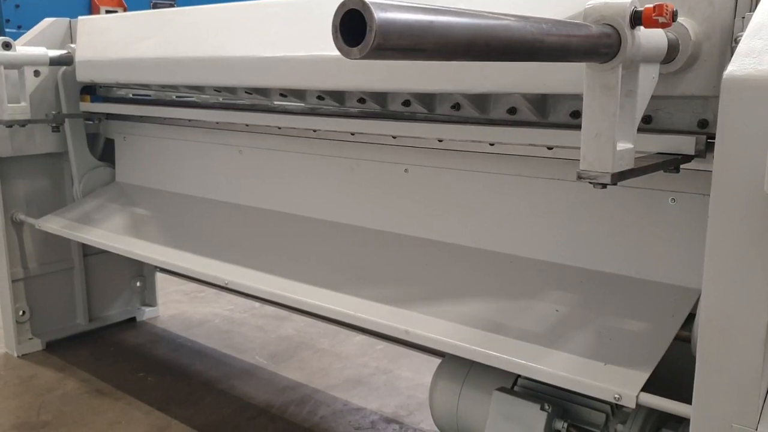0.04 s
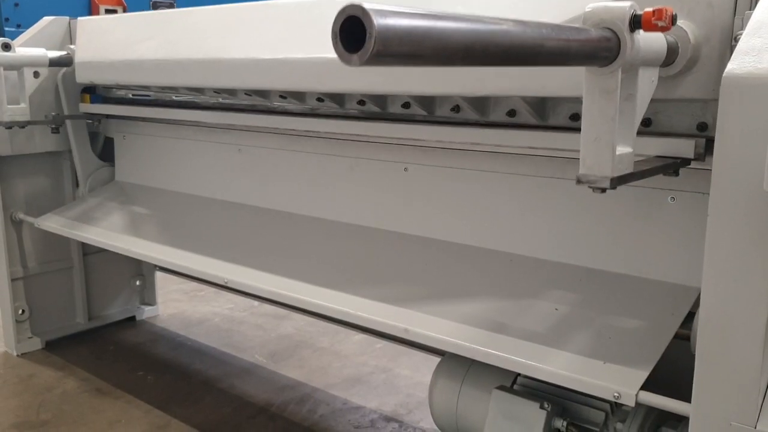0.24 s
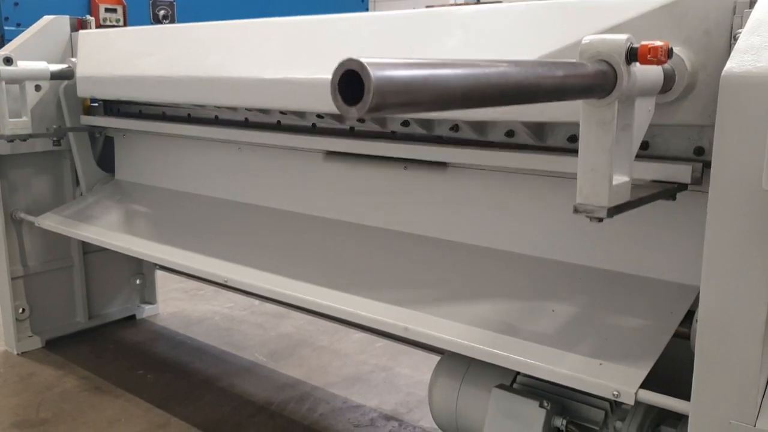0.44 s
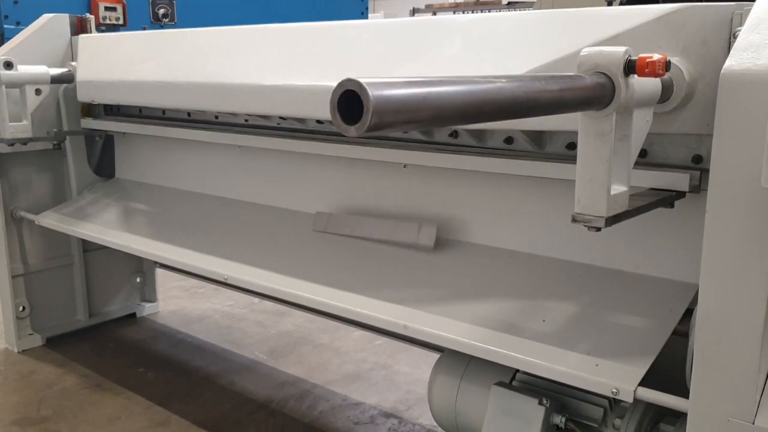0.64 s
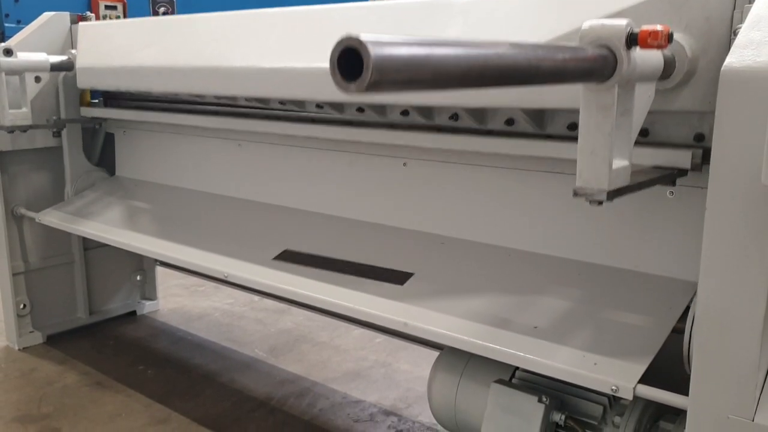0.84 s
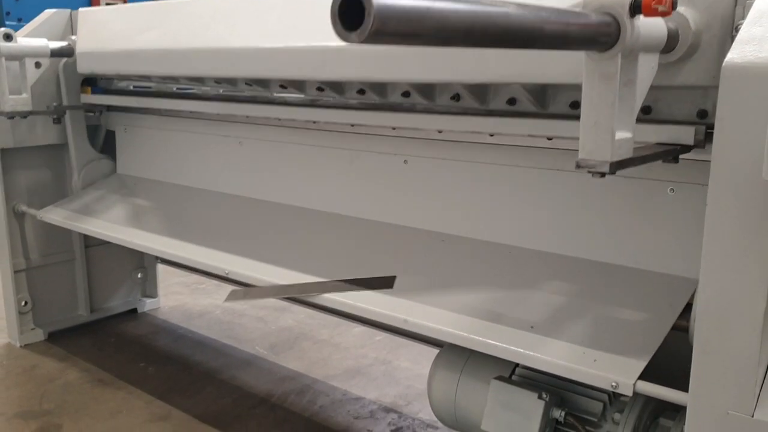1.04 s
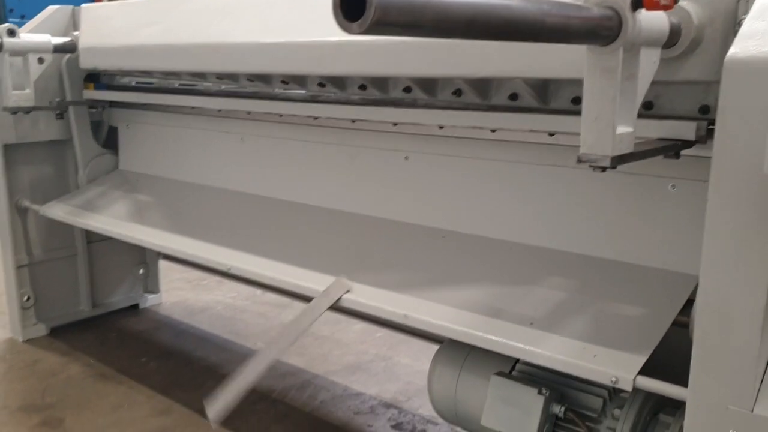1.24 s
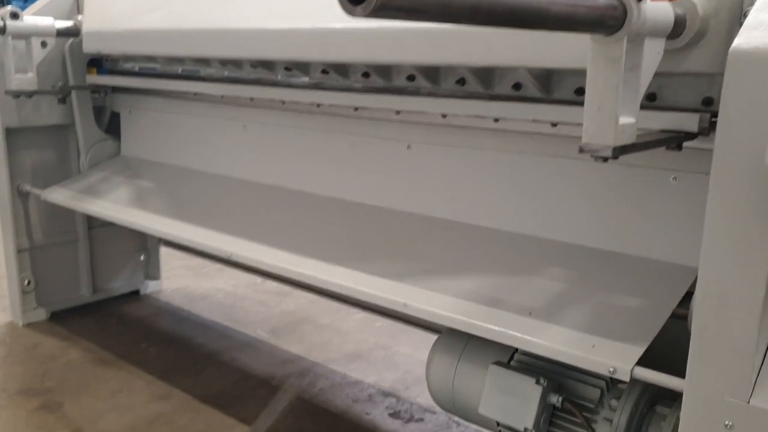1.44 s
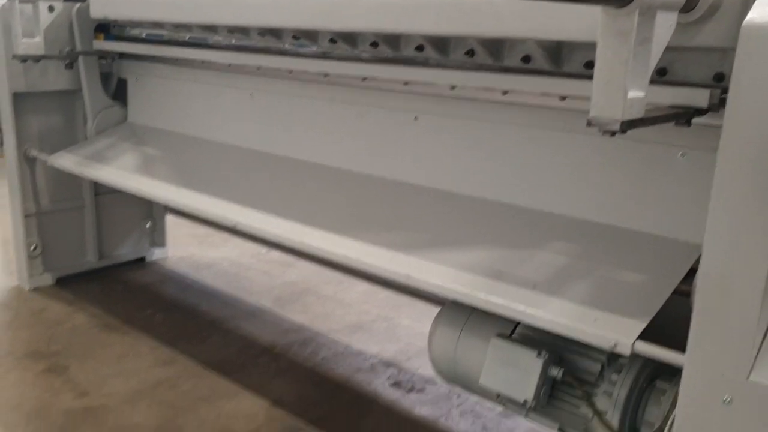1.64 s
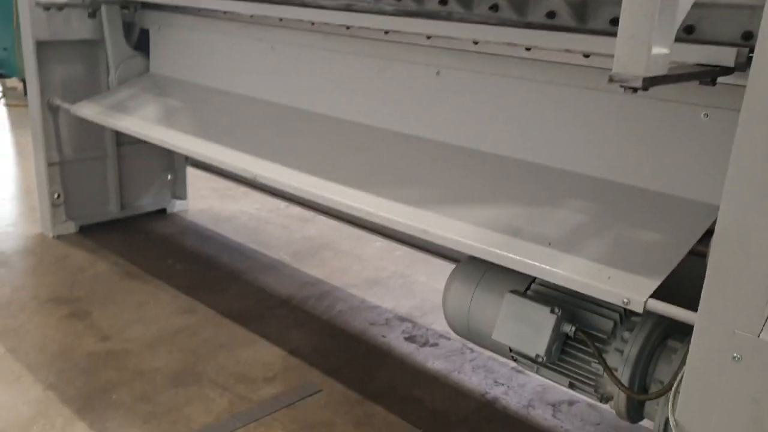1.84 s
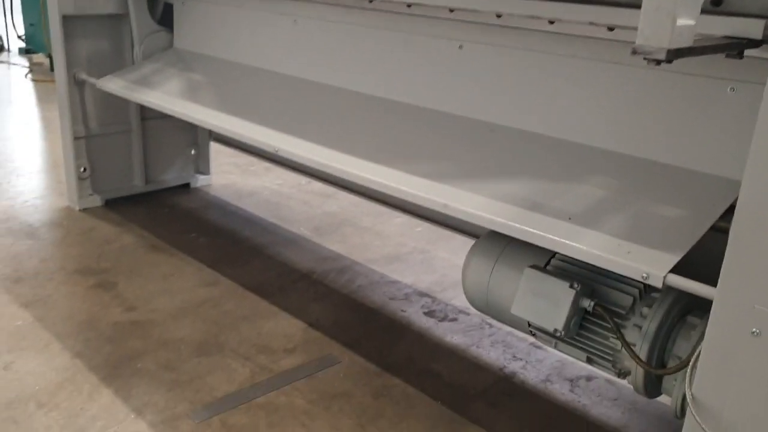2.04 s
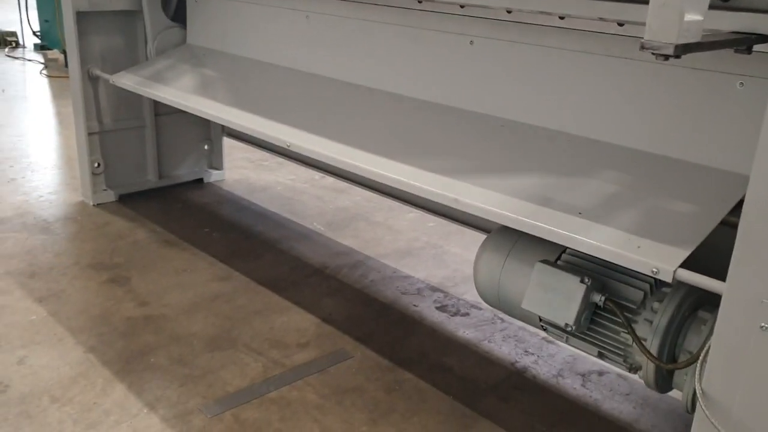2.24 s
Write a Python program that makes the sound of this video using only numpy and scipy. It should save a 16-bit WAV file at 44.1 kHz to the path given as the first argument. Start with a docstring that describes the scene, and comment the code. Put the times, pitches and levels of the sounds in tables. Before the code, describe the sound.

A metal shear cuts with a sharp clank and heavy bangs. The steel offcut crashes onto a metal chute, knocks its edge, then bounces and rings on concrete. A motor hums in the reverberant workshop, heard from nearby.

```python
"""In a large workshop, a guillotine shear makes one stroke: the clutch cracks in, the clamps thump
down and the blade bangs through a steel strip, each blow exciting the resonances of the frame.
The offcut crashes onto the sheet-metal chute and tips over its lip while the ram thumps home.
It then bounces on the concrete floor, ringing in its bending modes and slapping flat.
The motor hums underneath, and the hall prolongs every impact as diffuse reverberation."""
import sys
import numpy as np
from scipy import signal
from scipy.fft import rfft, irfft, next_fast_len
from scipy.io import wavfile

SR = 44100
rng = np.random.default_rng(int(sys.argv[2]) if len(sys.argv) > 2 else 0)


def wav_out(sig):
    """Save sig, one row per channel (or a flat mono array), as 16-bit PCM at SR to the path in sys.argv[1]."""
    wavfile.write(sys.argv[1], SR, np.round(np.clip(np.atleast_2d(sig).T, -1, 1) * 32767).astype(np.int16))


N = 101429
T = np.arange(N) / SR
FFT_SIZE = next_fast_len(2 * N)
HZ = np.maximum(np.arange(FFT_SIZE // 2 + 1) * SR / FFT_SIZE, 1)

# bending modes of the steel strip: pitch_hz, level_db
STRIP_MODES = [(3323, -6), (3488, -5.5), (3641, -16), (3779, -4.5), (3941, -3.5), (4285, -8.5),
               (4678, -8.5), (5130, -4.5), (5572, -7), (6089, -4), (6492, -8), (6654, -7.5), (7332, -2),
               (7870, -6), (8538, -4.5), (9022, -15.5), (9507, -11.5), (10056, 1), (10767, -13),
               (11030, -8), (11256, -30), (11585, 1), (12409, -7), (13329, 4), (13679, -6), (14330, -1)]


def from_db(db):
    """Amplitude ratio of a level in decibels."""
    return 10 ** (np.asarray(db) / 20)


def at_hz(points, hz, column=1):
    """Interpolation of a table on a logarithmic frequency axis."""
    points = np.array(points)
    return np.interp(np.log(hz), np.log(points[:, 0]), points[:, column])


def colour(x, gain_db):
    """Causal, minimum-phase filtering with the given gain at every HZ."""
    cepstrum = irfft(np.log(from_db(gain_db)), FFT_SIZE)
    cepstrum[0] /= 2
    response = np.exp(rfft(2 * cepstrum[:FFT_SIZE // 2], FFT_SIZE))
    return irfft(rfft(x, FFT_SIZE) * response, FFT_SIZE)[..., :N]


def per_octave(points):
    """Gain in dB that brings unit white noise to the given octave-band levels."""
    return at_hz(points, HZ) + 10 * np.log10(SR / 2 / np.log(2) / np.maximum(HZ, 20))


def diffuse_noise(coherent_below_hz=750):
    """White noise of a diffuse field: two points are coherent only at long wavelengths."""
    mid, side = rfft(rng.standard_normal((2, FFT_SIZE)))
    coherence = 1 / (1 + (HZ / coherent_below_hz) ** 2)
    spectra = np.sqrt(1 + coherence) * mid + np.sqrt(1 - coherence) * side * [[1], [-1]]
    return irfft(spectra, FFT_SIZE)[:, :N]


def strike(start, rise, t60):
    """Envelope of a damped vibration: square-root build-up, then exponential decay."""
    attack = np.sqrt(np.clip((T - start) / max(rise, 1e-4), 0, 1))
    return attack * np.exp(-np.log(1000) * np.clip((T - start - rise) / t60, 0, 10))


def struck_mode(start, rise, hz, db, t60):
    """Free vibration of a single mode: a damped sinusoid."""
    return from_db(db) * strike(start, rise, t60) * np.sin(2 * np.pi * hz * (T - start))


def crash(start, rise, t60, levels, chatter_db=2, chatter_per_s=900):
    """Modal overlap: a chattering contact excites so many plate modes that they merge into noise."""
    # the six crash bands, low to high: centre_hz
    bands_hz = [85, 400, 1600, 3400, 5600, 11000]
    steps = np.arange(2 * N // 20)
    chatter = from_db(chatter_db * np.interp(T * chatter_per_s, steps, rng.standard_normal(len(steps))))
    chatter /= np.sqrt(np.mean(chatter ** 2))
    burst = diffuse_noise() * chatter * strike(start, rise, t60)
    return colour(burst, per_octave(list(zip(bands_hz, levels))))


def motor(hum_hz=142, hum_db=-47, hum_start_s=0.88, hum_rise_s=1.5, end_gain_db=-7.5):
    """Steady broadband rumble of motor and room, slowly turned down; a hum grows after the cut."""
    # rumble of motor and room: frequency_hz, octave_level_db
    spectrum = [(25, -74), (55, -42.5), (110, -53.5), (300, -54.5), (900, -55.5), (2000, -62.5),
                (3200, -75.5), (16000, -81.5)]
    rumble = colour(diffuse_noise(), per_octave(spectrum)) * from_db(end_gain_db * T / T[-1])
    swell = np.clip((T - hum_start_s) / hum_rise_s, 0, 1)
    return rumble + from_db(hum_db) * swell * np.sin(2 * np.pi * hum_hz * T)


def reverberation(x, build_s=0.02):
    """Convolution with the hall's diffuse impulse response, in which high bands decay soonest."""
    # reverberant field: frequency_hz, level_db, t60_s
    hall = [(73, -21, 3.8), (380, -10, 2.45), (1450, -11, 2.2), (3260, -13, 1.63), (5540, -15, 1.48),
            (10500, -22, 1.1), (16100, -23, 0.58)]
    edges_hz = np.geomspace(20, 18000, 19)
    noise, response = rfft(diffuse_noise(), FFT_SIZE), 0
    for low, high in zip(edges_hz, edges_hz[1:]):
        hz = np.sqrt(low * high)
        decay = strike(0, build_s, at_hz(hall, hz, column=2))
        band = irfft(noise * ((HZ >= low) & (HZ < high)), FFT_SIZE)[:, :N]
        response = response + from_db(at_hz(hall, hz)) * band * decay / np.linalg.norm(decay)
    return signal.fftconvolve(x, response, axes=1)[:, :N]


def chute_lip(rise_s=0.00019):
    """Impulse excitation: the tipping strip knocks two pitched clanks from the chute's edge."""
    # knocks: start_s, level_db
    knocks = [(1.1285, -18), (1.2305, -24.5)]
    # modes of the lip: pitch_hz, level_db, t60_s
    modes = [(1338, 2.5, 0.058), (2390, -8.5, 0.086), (3110, -6, 0.075)]
    return sum(struck_mode(start, rise_s, hz, db + mode_db, t60)
               for start, db in knocks for hz, mode_db, t60 in modes)


def ring(start, hz, db, t60, rise_s=0.0049, scatter_db=1.34, relative_linewidth=0.0045):
    """Superposition of modes, each reaching each microphone with its own strength and phase."""
    out, first = np.zeros((2, N)), int(start * SR)
    t = T[:min(N - first, SR // 2)]
    strength = from_db(db + scatter_db * hz / hz[0] * rng.standard_normal((2, len(hz))))
    gain = strength * np.exp(2j * np.pi * rng.random((2, len(hz))))
    # the strip flexes as it tumbles, so each mode's phase wanders
    phase_step = np.sqrt(2 * np.pi * relative_linewidth * hz[:, None] / SR)
    wander = phase_step * np.cumsum(rng.standard_normal((len(hz), len(t))), axis=1)
    waves = np.exp(1j * wander + np.outer(2j * np.pi * hz - np.log(1000) / t60, t))
    out[:, first:first + len(t)] = (gain @ waves).real * (1 - np.exp(-t / rise_s))
    return out


def strip_hit(start, rise, t60, ring_db, ring_t60, spot_hz, levels, spot_db=11.5, spot_width_hz=46):
    """Impact gives a clash and a ring; the point of contact selects the modes excited most."""
    # weak bass of the strip, two lowest crash bands relative to the third: gain_db
    bass_gains = [-60, -23]
    clash = crash(start, rise, t60, [levels[0] + gain for gain in bass_gains] + levels)
    hz, mode_db = np.transpose(STRIP_MODES)
    favoured_db = spot_db * sum(np.exp(-((hz - spot) / spot_width_hz) ** 2) for spot in spot_hz)
    mode_t60 = ring_t60 * (hz[0] / hz) ** 0.53  # high modes die sooner
    return np.array([clash, ring(start, hz, ring_db + mode_db + favoured_db, mode_t60)])


def slap(start, db, end_hz, glide_hz=1660, glide_s=0.00045, sizzle_above_hz=14100):
    """Dispersion: high bending waves arrive first, so a flat landing clacks with falling pitch."""
    t = np.maximum(T - start, 0)
    cycles = end_hz * t + glide_hz * glide_s * (1 - np.exp(-t / glide_s))
    clack = strike(start, glide_s, t60=0.0082) * np.sin(2 * np.pi * (cycles + rng.random((2, 1))))
    # a hard slap also rings the very highest modes
    highpass = signal.butter(6, sizzle_above_hz, "high", fs=SR, output="sos")
    sizzle = signal.sosfilt(highpass, rng.standard_normal((2, N))) * strike(start, glide_s, t60=0.073)
    return from_db(db) * (clack + from_db(1) * sizzle)


def offcut(chute_t60_s=0.3, chute_spot_hz=(3325, 3641), peak_db=5.5, peak_width_hz=130, valley_db=-6):
    """Inelastic collisions: the strip lands on the chute, then bounces to rest on the floor."""
    # on the chute: start_s, rise_s, t60_s, ring_db, octave_level_db in the upper four crash bands
    chute_hits = [(0.608, 0.0058, 0.39, -33, -16, -21.5, -16, -21.5),
                  (0.62, 0.027, 0.14, -21.5, -17.5, -23, -9.5, -19),
                  (0.766, 0.017, 0.14, -33, -43, -32.5, -26, -30),
                  (0.807, 0.0076, 0.24, -21, -19, -17.5, -15.5, -18.5)]
    # on the floor: start_s, rise_s, t60_s, ring_db, ring_t60_s, spot_hz, other_spot_hz,
    # octave_level_db in the upper four crash bands
    floor_hits = [(1.445, 0.0085, 0.15, -23, 0.35, 3488, 6654, -34, -29.5, -21.5, -10.5),
                  (1.599, 0.0077, 0.19, -29, 0.5, 4678, 5130, -47.5, -28.5, -20, -23.5),
                  (1.609, 0.014, 0.059, -25.5, 0.19, 11256, 11030, -42, -52, -44, -13),
                  (1.693, 0.0023, 0.17, -20.5, 0.16, 3779, 6089, -40, -40, -22.5, -38),
                  (1.755, 0.0034, 0.083, -28, 0.6, 13330, 4678, -29.5, -26.5, -24.5, -15),
                  (1.778, 0.0017, 0.087, -20.5, 0.43, 3941, 9022, -25.5, -19, -32, -16.5),
                  (1.817, 0.0055, 0.079, -31, 1, 4678, 5572, -30.5, -40, -19, -27),
                  (1.9275, 0.00081, 0.044, -28, 0.29, 3488, 3323, -34.5, -23, -21, -19.5),
                  (1.938, 0.0012, 0.16, -25.5, 0.21, 3488, 3779, -35, -21.5, -26, -20.5),
                  (1.955, 0.0031, 0.1, -26.5, 0.3, 3488, 11585, -53, -43, -20.5, -38),
                  (2.021, 0.0066, 0.087, -38, 0.44, 3488, 3323, -36.5, -23.5, -24.5, -25),
                  (2.096, 0.007, 0.13, -60, 0.35, 3323, 3488, -30.5, -42, -44, -56)]
    # flat landings on concrete: start_s, level_db, end_hz
    slaps = [(1.4463, -14, 1730), (1.756, -13, 2260), (1.7773, -6.5, 1450), (1.787, -11, 1960),
             (1.8162, -9.5, 1620), (1.9468, -19, 1900), (2.0279, -12.5, 1760), (2.101, -37, 1300)]
    chute = sum(strip_hit(start, rise, t60, db, chute_t60_s, chute_spot_hz, levels)
                for start, rise, t60, db, *levels in chute_hits)
    floor = sum(strip_hit(start, rise, t60, db, ring_t60, (hz, other_hz), levels)
                for start, rise, t60, db, ring_t60, hz, other_hz, *levels in floor_hits)
    clashes, rings = chute + floor
    # the strip's resonances colour every clash
    peaks = sum(1 / (1 + (2 * (HZ - hz) / peak_width_hz) ** 2) for hz, _ in STRIP_MODES)
    shelf_db = valley_db * np.minimum(HZ / STRIP_MODES[0][0], 1) ** 10
    body_db = 10 * np.log10(1 + from_db(peak_db) ** 2 * peaks) + shelf_db
    return colour(clashes, body_db) + rings + sum(slap(*row) for row in slaps)


def clamp_scrape(centre_hz=5150, width_hz=730):
    """Friction of steel on steel drives one narrow resonance as the clamps grip."""
    # sliding contact: start_s, rise_s, t60_s, level_db
    slips = [(0.297, 0.023, 0.11, -19.5)]
    edges_hz = [centre_hz - width_hz / 2, centre_hz + width_hz / 2]
    rub = signal.sosfilt(signal.butter(2, edges_hz, "band", fs=SR, output="sos"), diffuse_noise())
    envelope = sum(from_db(db) * strike(start, rise, t60) for start, rise, t60, db in slips)
    return rub / rub.std() * envelope


def machine_and_chute_modes():
    """Damped modes: the stroke's clanks, booms and rings, then the chute's low ring as the strip slides."""
    # single modes: start_s, rise_s, pitch_hz, level_db, t60_s
    modes = [(0.2187, 0.0012, 2780, -12.5, 0.061), (0.2174, 0.00087, 2250, -15, 0.069),
             (.233, 0.011, 396, -14, 0.21), (0.292, 0.0096, 66, -10, 0.12), (.417, 0.0035, 501, -15, 0.13),
             (0.475, 0.0064, 70.4, -3, 0.25), (.472, .002, 5190, -17, 0.26),
             (.472, 0.0028, 5577, -15, 0.28), (.478, 0.045, 156.3, -10, 0.14),
             (0.961, 0.12, 449, -31, 0.24)]
    return sum(struck_mode(*mode) for mode in modes)


def shear_blows():
    """Source and resonator: heavy broadband blows are reinforced at the frame's natural frequencies."""
    # blows to the machine: start_s, rise_s, t60_s, octave_level_db in all six crash bands
    impacts = [(0.2155, 0.0059, 0.14, -41, -42, -23.5, -16.5, -16, -29),
               (0.222, 0.027, 0.88, -33, -28.5, -24, -31, -42, -41),
               (0.29, 0.018, 0.24, -15.5, -32.5, -25.5, -30, -25, -50),
               (0.412, 0.034, 0.73, -21.5, -20.5, -23, -28, -30, -33.5),
               (0.468, 0.0077, 0.073, -21, -22.5, -66, -12, -28, -14.5),
               (0.476, 0.023, 0.5, -21.5, -28, -20, -23, -19, -30.5),
               (1.076, 0.021, 0.24, -40.5, -32, -28, -40, -34, -56),
               (1.1306, 0.00098, 0.21, -38.5, -34.5, -27.5, -27.5, -36.5, -45),
               (1.228, 0.00032, 0.3, -47, -44.5, -40, -37.5, -43, -44.5)]
    # frame resonances: pitch_hz, width_hz, gain_db
    frame = [(122.3, 11, 0.5), (188.3, 44, 3.5), (581, 18, 1.5), (1187, 15, 4.5), (2283, 26, -10)]
    blows = sum(crash(start, rise, t60, levels) for start, rise, t60, *levels in impacts)
    return blows + sum(from_db(db) * signal.lfilter(*signal.iirpeak(hz, hz / width, fs=SR), blows)
                       for hz, width, db in frame)


def scene():
    """Superposition of the direct sound, its reverberant field and the motor."""
    direct = shear_blows() + machine_and_chute_modes() + clamp_scrape() + chute_lip() + offcut()
    return direct + reverberation(direct) + motor()


def record(dry, stopband_hz=16800):
    """Transduction by two microphones of unequal response, then peak clipping and a low-pass."""
    # mean response: frequency_hz, gain_db
    response = [(20, -34), (36, -11), (58, -5), (800, -4), (1050, -5.5), (2300, -3), (4500, -2),
                (8000, -10), (10800, -1.5), (13000, -6.5), (14300, -15)]
    # channel imbalance: frequency_hz, left_minus_right_db
    imbalance = [(60, 1.5), (260, -1), (1300, -4.5), (2800, -6.5), (4000, -4), (5500, -2.5), (7500, 15),
                 (11500, 15), (13500, 6), (16000, 0)]
    heard = np.array([colour(channel, at_hz(response, HZ) + side * at_hz(imbalance, HZ) / 2)
                      for channel, side in zip(dry, (1, -1))])
    lowpass = signal.cheby2(12, 60, stopband_hz, fs=SR, output="sos")
    return signal.sosfilt(lowpass, np.clip(heard, -1, 1))


dry = scene()
out = record(dry)
wav_out(out)
```